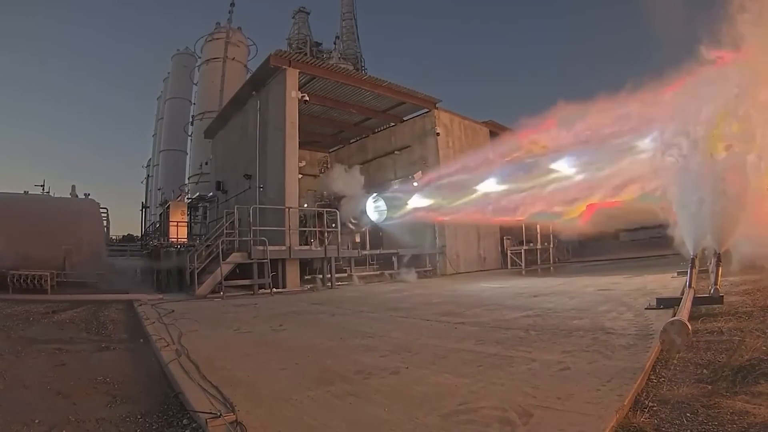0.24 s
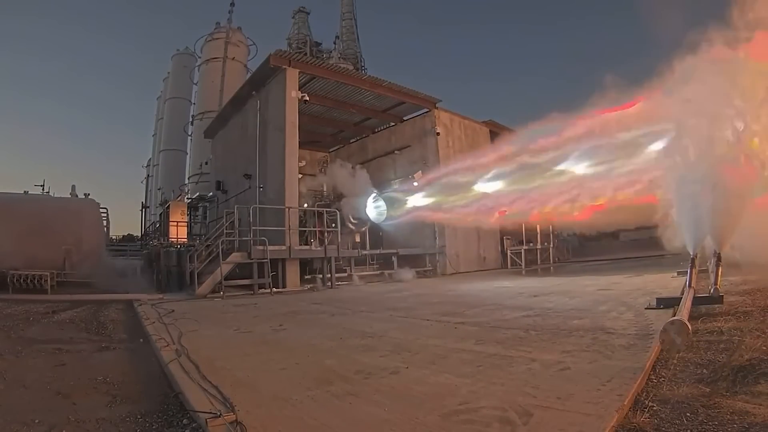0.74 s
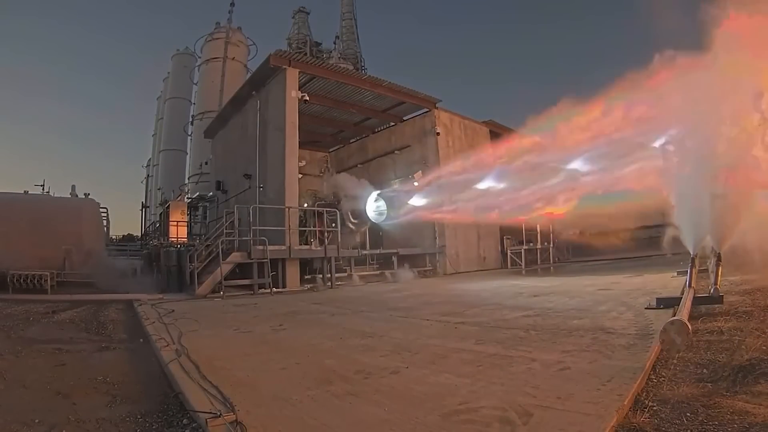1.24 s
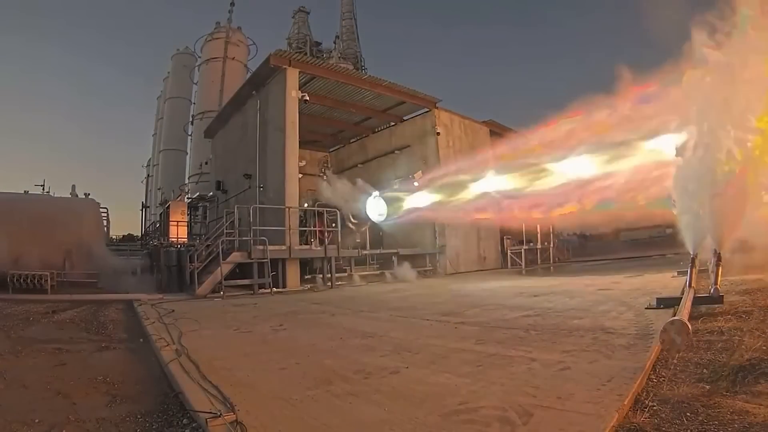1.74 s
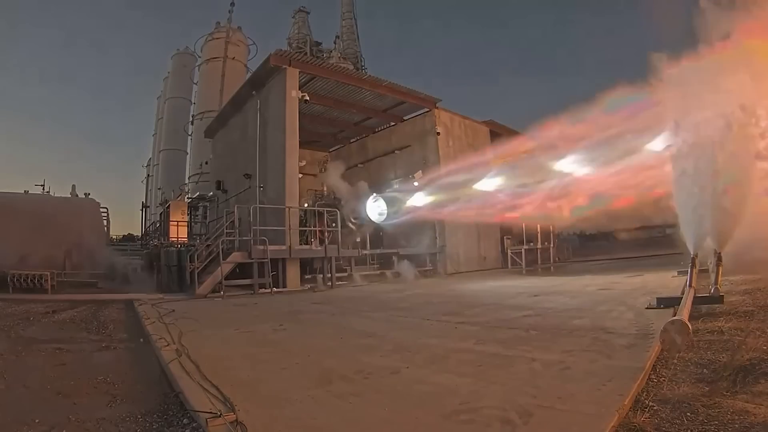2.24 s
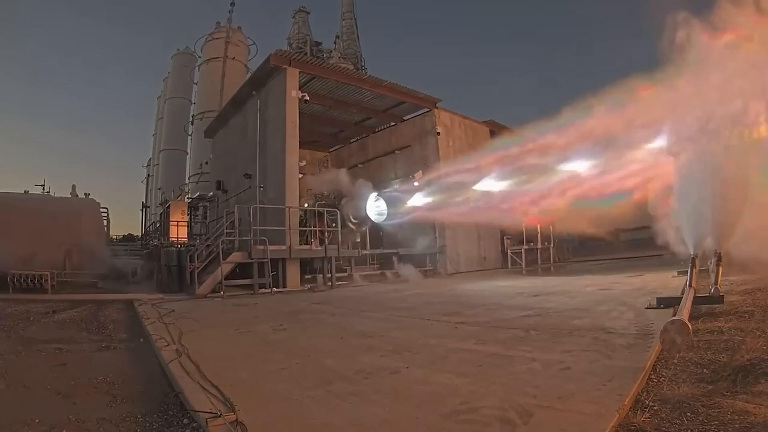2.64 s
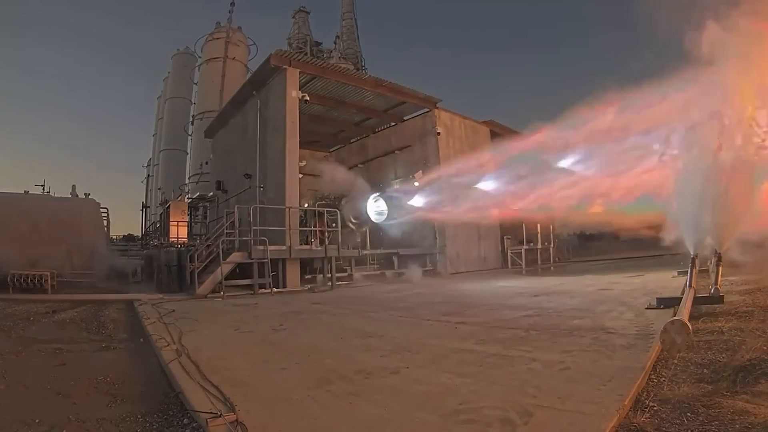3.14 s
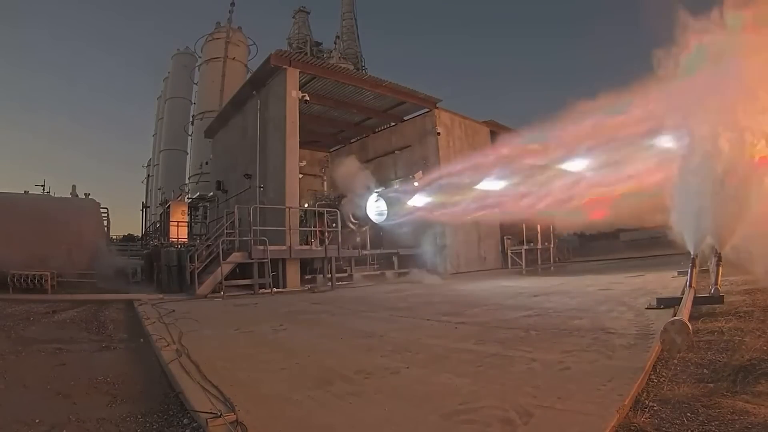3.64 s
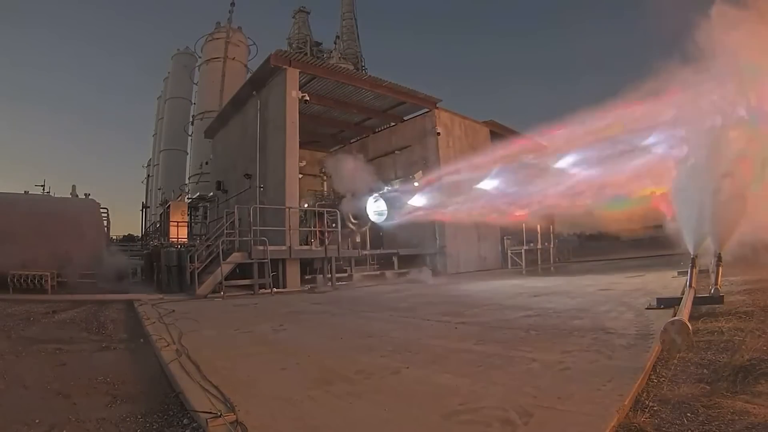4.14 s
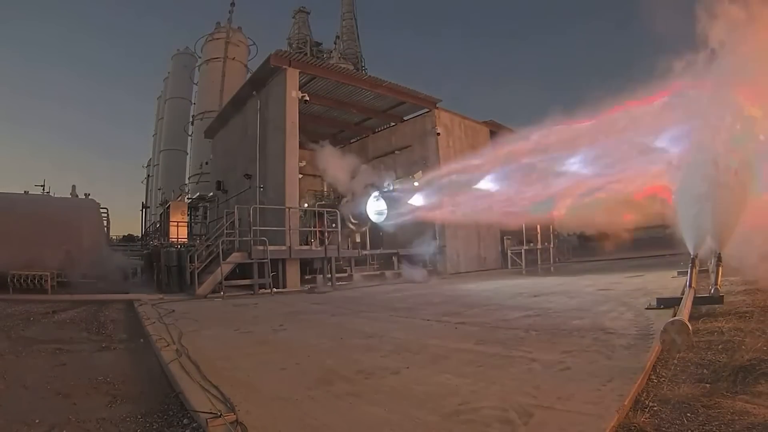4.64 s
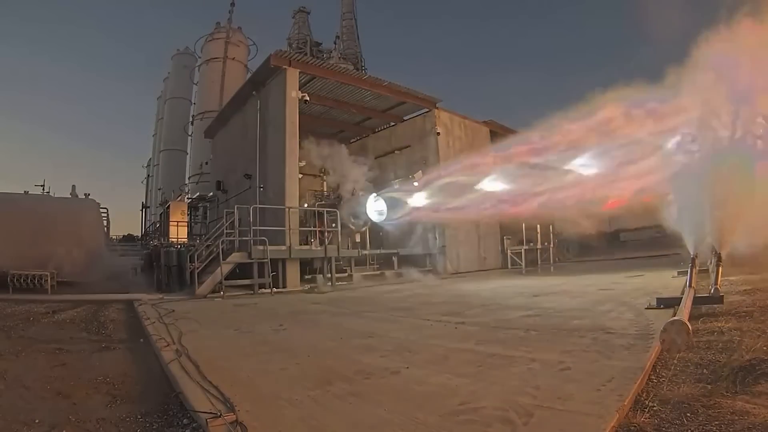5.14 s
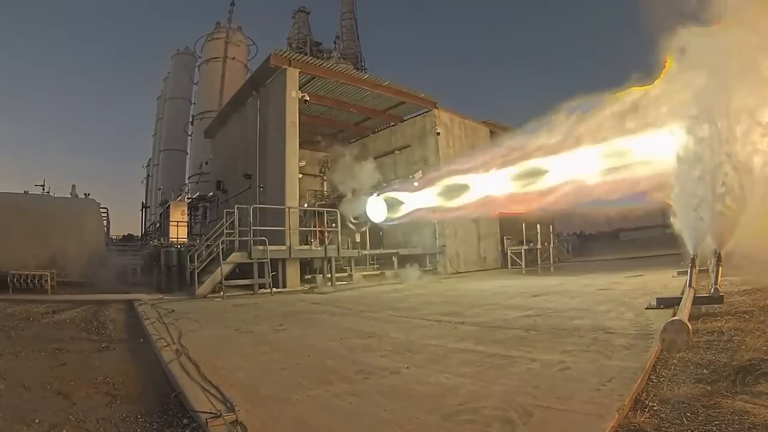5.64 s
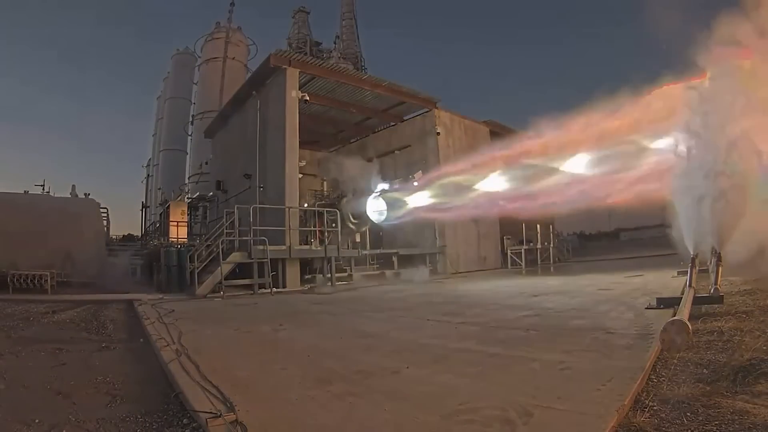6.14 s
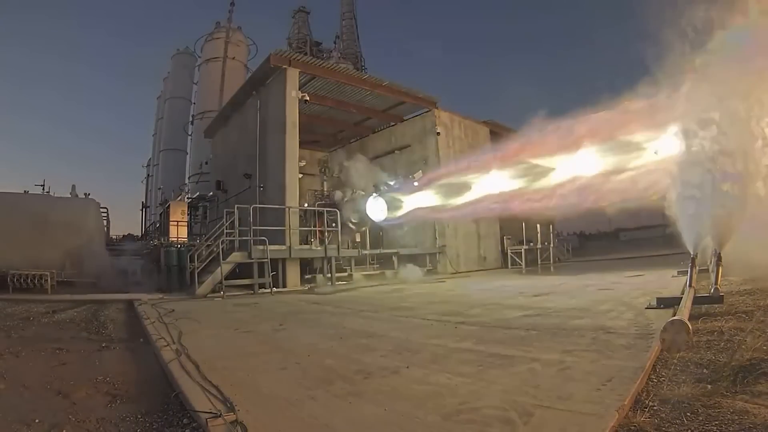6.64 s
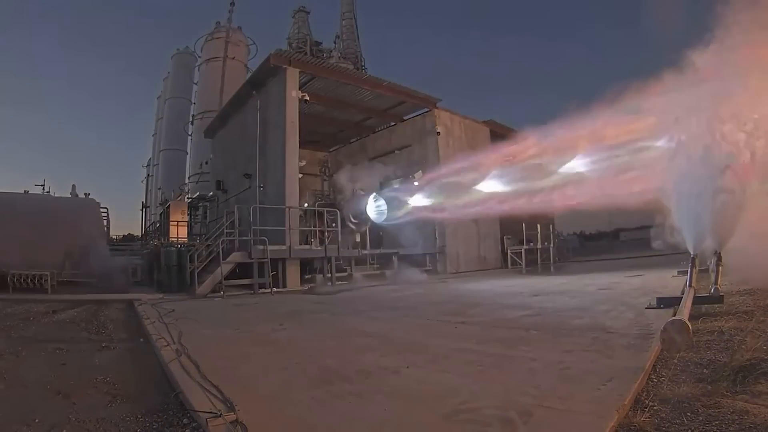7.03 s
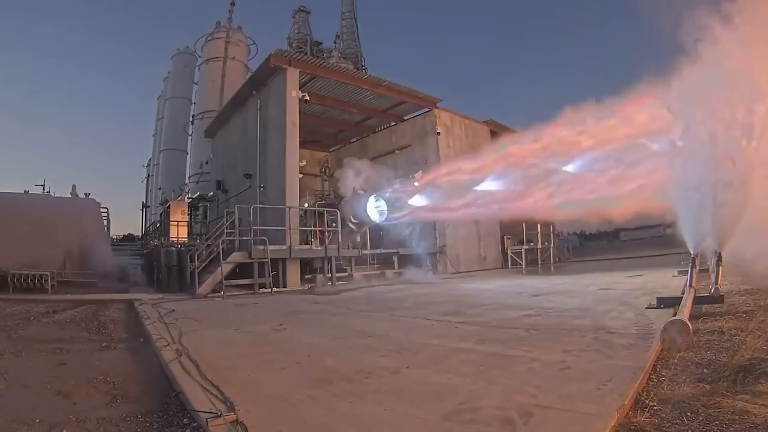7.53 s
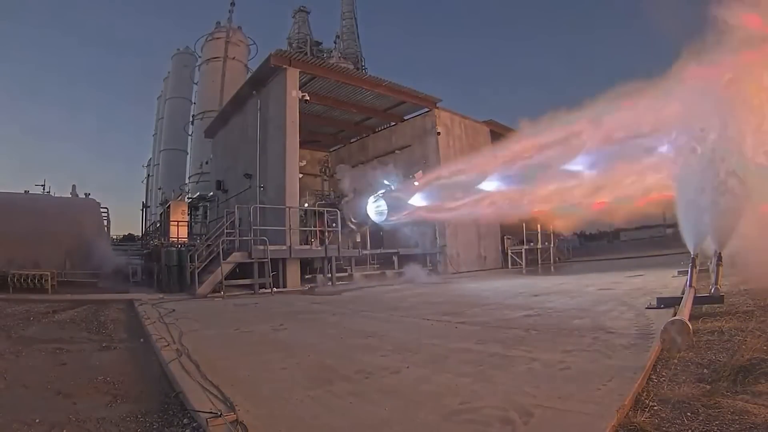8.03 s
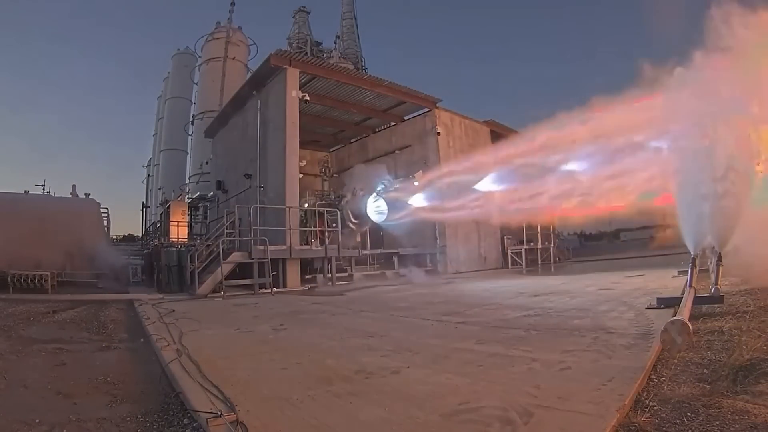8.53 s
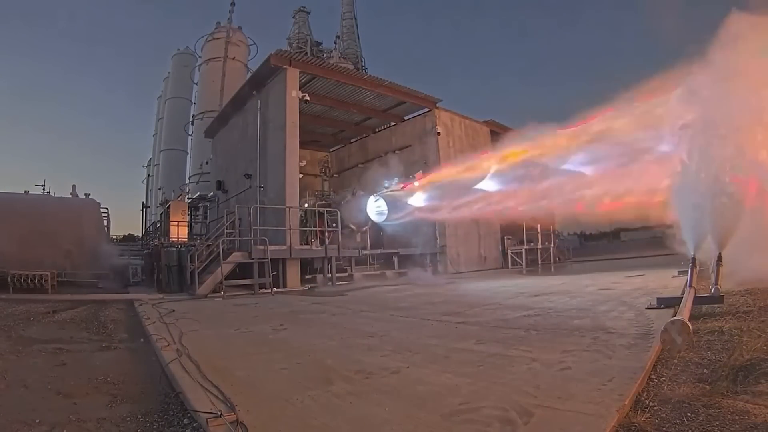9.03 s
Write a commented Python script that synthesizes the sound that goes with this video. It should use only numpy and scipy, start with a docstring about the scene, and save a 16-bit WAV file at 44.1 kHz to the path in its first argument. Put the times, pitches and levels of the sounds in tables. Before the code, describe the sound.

Steady, overwhelming rocket exhaust outdoors, already burning and never stopping. Low bass rumble and a dark, rough roar dominate, with only faint unsteady hiss above. Random pops, cracks and dull knocks tumble over it in clumps, busiest in the first half and sparser later. Short reflections from nearby pipes, walls and an open bay blur each hit. The close stereo microphone sounds boxed in, its level held tightly by limiting.

```python
"""Rocket engine on a test stand

A rocket engine fires steadily outdoors, heard by a small camera in a closed housing.
Layers of shaped noise make the deep, turbulent roar; trains of pulses make the crackle of shock fronts.
Each front arrives dull, then bright off nearby surfaces, and rings the housing with a thud.
The camera's gain control and limiter hold the level."""
import sys
import numpy as np
from scipy import signal
from scipy.fft import rfft, irfft, next_fast_len
from scipy.io import wavfile
from scipy.ndimage import uniform_filter1d, minimum_filter1d

SR = 44100
rng = np.random.default_rng(int(sys.argv[2]) if len(sys.argv) > 2 else 0)


def unload_audio(sound):
    """Save the sound as a 16-bit wav file, at the path given as the first command line argument."""
    columns = np.transpose(np.atleast_2d(sound))
    # keep every value between -1 and 1, then stretch to whole-number steps
    steps = np.round(np.clip(columns, -1, 1) * 32767)
    wavfile.write(sys.argv[1], SR, steps.astype(np.int16))


def boost_factor(decibels):
    """Convert a level in decibels to a linear amplitude factor."""
    exponent = np.asarray(decibels, float) / 20
    return 10 ** exponent


N = 409248


def evened(x):
    """Scales a signal to an rms of 1."""
    return x / np.sqrt(np.mean(x ** 2) + 1e-20)


def read(points, hz):
    """Reads a table between its rows, on a log-frequency axis."""
    f, value = np.transpose(points)
    return np.interp(np.log(hz + 1), np.log(f + 1), value)


def stream(column):
    """One column of the stream of small shock fronts, in dB at every sample."""
    # How strong the stream is over time. Each row: time in seconds, base level of the thuds
    # in the housing in dB, base level shared by the cracks and the hiss in dB.
    stream_levels = [(0, -22.5, -43.5), (1.7, -24, -44.5), (2.35, -22, -42), (3.6, -23.5, -45),
                     (4.06, -21.5, -42.5), (4.6, -24, -44.5), (6.7, -24.5, -43.5), (7.1, -27, -45.5),
                     (9.28, -27.5, -46)]
    return np.interp(np.arange(N) / SR, *np.transpose(stream_levels)[[0, column]])


def plume(column):
    """Level of one layer of the steady burn, drifting evenly, in dB at every sample."""
    # Levels at the start: rumble in dB, roar in dB.
    start_db = (-12.5, -16.5)
    # How fast each level changes: rumble in dB per second, roar in dB per second.
    change_db_per_s = (0.34, 0.04)
    return start_db[column] + change_db_per_s[column] * np.arange(N) / SR


def turbulence(spectrum, size, patchy_db, flicker_db):
    """Stereo noise from random short-time spectra, with drifting patches and a flicker of all pitches."""
    # How alike left and right are. Each row: frequency in Hz, likeness (1 = the same).
    likeness = [(300, 1.0), (450, 0.93), (680, 0.65), (1800, 0.7), (2900, 0.9), (8000, 0.6)]
    frames, hz = 4 * N // size + 5, np.fft.rfftfreq(size, 1 / SR)
    a, b, c, d, patches = rng.standard_normal((frames, len(hz), 5)).T
    patches = uniform_filter1d(patches, size=8, axis=0)  # smooth across frequency
    patches = evened(uniform_filter1d(patches, size=8, axis=1))  # and across time
    flicker = evened(uniform_filter1d(rng.standard_normal(frames), size=3))
    same = read(likeness, hz)[:, None]
    left, other = a + 1j * b, c + 1j * d
    right = same * left + np.sqrt(1 - same ** 2) * other
    level_db = read(spectrum, hz)[:, None] + patchy_db * patches + flicker_db * flicker
    spectra = np.array([left, right]) * boost_factor(level_db)
    return evened(signal.istft(spectra, nperseg=size, noverlap=3 * size // 4)[1][:, :N])


def roar():
    """Large eddies rumble, smaller ones roar and hiss: three layers of shaped noise."""
    # Tone of the rumble. Each row: frequency in Hz, relative level in dB.
    rumble_tone = [(22, -49), (41, 0.5), (65, -1.5), (86, -6.5), (112, -24.5), (150, -48), (250, -120)]
    # Tone of the roar. Each row: frequency in Hz, relative level in dB.
    roar_tone = [(65, -1.5), (110, -2), (201, -4.5), (285, -2.5), (405, -14), (534, -15.5), (628, -9.5),
                 (777, -12), (892, -20), (1150, -20.5), (1550, -25.5), (2200, -29), (2860, -36),
                 (4840, -120)]
    # Tone of the hiss. Each row: frequency in Hz, relative level in dB.
    hiss_tone = [(1500, -29), (2200, 3.5), (3200, 14.5), (4500, 5.5), (6000, -11), (8500, -19.5),
                 (11000, -35), (12500, -20)]
    rumble = boost_factor(plume(column=0)) * turbulence(rumble_tone, size=4096, patchy_db=1.45, flicker_db=1.0)
    body = boost_factor(plume(column=1)) * turbulence(roar_tone, size=2048, patchy_db=0.8, flicker_db=0.92)
    hiss = boost_factor(stream(column=2)) * turbulence(hiss_tone, size=256, patchy_db=1.5, flicker_db=4.0)
    return rumble + body + hiss


def housing_ring(t, pitch):
    """Wall and cavity of the housing act in series: each ring swells, then dies."""
    # Rings of the housing. Each row: frequency in Hz at a pitch of 1, relative level in dB,
    # time to the peak of the ring in milliseconds.
    rings = [(640, -11, 1.4), (865, 0, 1.0), (1250, -15, .6), (1540, -17, 1.4)]
    ring = 0
    for f, db, peak_ms in rings:
        u = 1000 * t / peak_ms
        ring = ring + boost_factor(db) * u * np.exp(1 - u) * np.sin(2 * np.pi * f * pitch * t)
    return ring


def bay_boom(t):
    """The open bay booms: low tones that start softly and die away."""
    # Tones of the open bay. Each row: frequency in Hz, level in dB, time to fall by 60 dB
    # in seconds, start in milliseconds after the bright arrival.
    tones = [(51.5, 1, 0.14, 4), (84.1, -6.5, 0.25, 8.5), (212.3, -3, 0.071, -0.6),
             (269, -5.5, 0.059, -0.19)]
    boom = 0
    for f, db, t60, late_ms in tones:
        since = np.maximum(t - (late_ms + 10) / 1000, 0)
        onset = 1 - np.exp(-since / 0.002)
        boom = boom + boost_factor(db - 60 * since / t60) * onset * np.sin(2 * np.pi * f * since)
    return boom


def fray(t, count):
    """Turbulent air frays each crack into a short burst: spectra of a pulse plus fading noise."""
    smear_ms, smear_db = 0.9, -3  # decay time of the noise, its level against the pulse
    noise = rng.standard_normal((count, len(t))) * np.exp(-1000 * t / smear_ms)
    return 1 + boost_factor(smear_db) * rfft(noise / np.linalg.norm(noise, axis=1, keepdims=True))


def arrivals(pitch, size=16384):
    """Thud, first crack with echoes, and bright crack of a front; the paths shift with its birthplace."""
    # Ways from plume to camera. Each row: delay in milliseconds after the bright arrival at a pitch
    # of 1 and before random shifts, thud in relative dB, crack in relative dB, treble limit in Hz.
    paths = [(-4.5, 0, 4, 7500), (-3.3, -10, -2, 7000), (-.1, -9, 0, 16000), (6.2, -6, -3, 6000),
             (8.2, -13, -5, 6000), (12.5, -15, -8, 7000)]
    # Tone of a crack. Each row: frequency in Hz, relative level in dB.
    crack_tone = [(400, -26), (1200, 13), (2000, 4), (3500, -4), (6000, -13.5), (8800, -12.5), (11000, -12),
                  (12500, -26.5), (13300, -90)]
    glance_hz = 2320  # the bright arrival glances off small surfaces, which return only short waves
    hz, t = np.fft.rfftfreq(size, 1 / SR), np.arange(size) / SR
    ms, thud_db, crack_db, top_hz = np.transpose(paths)[:, :, None]
    shift, lean = rng.standard_normal((2, len(paths), 1))
    late_ms = ms * (1 / pitch + 0.035 * shift) + 10  # starts 10 ms ahead of the bright arrival
    delay = boost_factor(0) * boost_factor(20 * np.log10(boost_factor(1.5 * lean))) * np.exp(-2j * np.pi * hz * late_ms / 1000)

    ring = housing_ring(t, pitch + 0.029 * shift[-1])
    thud = irfft(rfft(ring) * (boost_factor(thud_db) * delay).sum(0))
    thud = thud / abs(thud).max() + bay_boom(t)

    dulled = boost_factor(crack_db) / (1 + 1j * hz / top_hz) ** 2  # paths round an obstacle lose their treble
    crack = boost_factor(read(crack_tone, hz)) * dulled * delay * fray(t, len(paths))
    bright = abs(ms[:, 0]) < 2
    first = crack[~bright].sum(0)
    later = crack[bright].sum(0) * (1j * hz / (1j * hz + glance_hz)) ** 2
    # each crack is scaled by its peak within the band where it stands out
    first_peak = abs(irfft(first * (hz > 2200) * (hz < 6000))).max()
    later_peak = abs(irfft(later * (hz > 5000) * (hz < 9500))).max()
    return thud, irfft(first)[:size // 8] / first_peak, irfft(later)[:size // 8] / later_peak


def scatter(x, wet_db, t60):
    """Sparse taps off pipes and walls, other ones at each port; three sets take turns as the plume shifts."""
    out, turn, length = np.zeros((2, N)), np.arange(N) / SR / 0.037, 2400
    upper = signal.sosfilt(signal.butter(2, 450, "high", fs=SR, output="sos"), x)  # long waves pass the pipes
    for k in range(3):
        taps = rng.choice([-1., 1.], (2, length)) * (rng.random((2, length)) < 0.05)
        taps *= boost_factor(-60 * np.arange(length) / SR / t60)
        taps /= np.linalg.norm(taps[0])
        share = np.sqrt(2 / 3) * np.cos(np.pi * (turn + k / 3))
        out += signal.oaconvolve((upper * share)[None], taps, axes=1)[:, :N]
    return x + boost_factor(wet_db) * out


def small_fronts():
    """A clumped random stream of small fronts: pulse trains for thuds, first cracks and bright cracks."""
    per_s, spread_db = 420, 6  # average rate, spread of the random sizes
    chance, size, clump = rng.random(N), rng.exponential(1, N), rng.standard_normal(N)
    clump = boost_factor(3.5 * evened(uniform_filter1d(clump, size=1800)))
    happens = chance < clump / clump.mean() * per_s / SR
    small = happens * boost_factor(spread_db * np.minimum(size, 2.5))
    cracks = small * boost_factor(stream(column=2) - 3)
    cracks = signal.lfilter(*signal.butter(1, 4240, fs=SR), cracks)  # weak fronts are less steep
    thuds = small ** 0.56 * boost_factor(stream(column=1))  # thuds differ less in level than cracks
    return thuds, cracks * boost_factor(8), cracks


def crackle(count=14):
    """Strong and small fronts from wandering birthplaces, each a thud in the housing and a sharp crack."""
    # The strongest shock fronts. Each row: time of the bright arrival in seconds, thud level in dB,
    # first crack level in dB, bright crack level in dB.
    shocks = [(0.1757, -8, -13, -20), (0.2816, -12, -27, -33), (0.3727, -10, -18, -33),
              (0.4393, -20, -34, -30), (0.4833, -9, -13, -28), (0.6072, -11, -19.5, -32),
              (0.908, -18, -22, -38.0), (0.9835, -5, -16, -20), (0.9987, -6, -17.5, -39.0),
              (1.0909, -2.5, -16, -34.0), (1.4368, -5, -16, -23), (1.7168, -9, -21, -29),
              (2.0568, -10, -18, -26), (2.0709, -10, -30, -27), (2.1641, -3.5, -15, -22),
              (2.2236, -7, -23, -27), (2.2846, -3.5, -19, -21), (2.292, -24, -19, -21.5),
              (2.3545, -5.5, -21, -29), (2.361, -16, -19.5, -24), (2.381, -5.5, -18, -21),
              (2.4543, -6, -20, -27), (2.4844, -8, -31, -25), (2.586, -6.5, -17, -36),
              (2.659, -11, -25, -20), (2.7643, -9, -21, -24), (2.8155, -11, -27, -29),
              (2.8763, -14, -27, -28), (2.902, -5, -20, -23.5), (2.9685, -6, -18.5, -22),
              (3.0263, -4.5, -20, -23), (3.1244, -14, -26, -28), (3.1908, -10, -29, -27.0),
              (3.222, -10.5, -22, -36.0), (3.324, -7, -17, -23), (3.4483, -10, -24, -27),
              (3.7664, -7, -23, -19), (3.7777, -6, -16, -26), (3.8191, -6, -24, -20),
              (3.8765, -6, -18, -20), (3.896, -9, -16.5, -22), (3.9065, -5, -24, -26),
              (3.924, -8, -21, -31), (3.9591, -17, -31, -27), (4.0495, -8, -24, -19),
              (4.0776, -17, -26, -29), (4.1184, -18, -26, -32.0), (4.1801, -5, -27, -20),
              (4.1918, -11, -17, -26), (4.2396, -8, -19, -28), (4.271, -2.5, -16.5, -16.5),
              (4.3877, -9.5, -25, -26), (4.5762, -6.5, -26, -24), (4.6125, -4.5, -17, -32),
              (4.677, -8, -16.5, -33.0), (4.7226, -6, -16, -25), (4.8075, -6, -18, -20),
              (4.8207, -6, -21, -21), (4.6854, -10, -27, -27), (4.9772, -7.5, -31, -25),
              (5.206, -7.5, -26, -23), (5.2163, -11.5, -16.5, -27), (5.2599, -5.5, -15, -21),
              (5.3225, -8.5, -26.0, -22), (5.604, -13, -30, -27), (5.6496, -5.5, -18.5, -25),
              (5.7363, -6.5, -17, -27.0), (5.7961, -10, -18, -31), (5.866, -18, -24, -31),
              (5.893, -8, -20, -37), (5.929, -7, -18, -21), (6.213, -14, -21.5, -40),
              (6.5804, -14, -24, -34), (6.709, -11, -19.5, -32), (6.8223, -9.5, -23, -27),
              (7.0505, -12, -21, -28), (7.1434, -13, -23, -28), (7.167, -11, -20, -25),
              (7.3607, -6, -20.5, -33), (7.5767, -14, -23, -31), (7.804, -9.5, -24.5, -32),
              (7.8853, -27, -27, -47), (7.9443, -18, -26, -30), (8.0922, -18, -21, -21),
              (8.2075, -7.5, -16.5, -23), (8.2575, -21, -22, -31), (8.4, -13, -19.5, -39),
              (8.637, -11, -19, -25), (8.7177, -12, -29, -34), (8.7902, -10, -35, -27)]
    ring_rise = 0.064  # the ring climbs and the paths tighten by this share from start to end
    thuds, firsts, cracks = small_fronts()
    s, thud_db, first_db, crack_db = np.transpose(shocks)
    at = np.round(s * SR).astype(int)
    thuds[at] += boost_factor(thud_db)
    firsts[at] += boost_factor(first_db)
    cracks[at] += boost_factor(crack_db)

    place = count * np.arange(N) / N + 2 * rng.standard_normal(N)  # birthplaces wander
    place = np.clip(place, 0, count - 1).astype(int)
    fronts, early = 0, round(SR / 100)  # the shapes start 10 ms early
    for k in range(count):
        shapes = arrivals(1 + ring_rise * ((k + 0.5) / count - 0.5))
        for train, shape in zip((thuds, firsts, cracks), shapes):
            fronts = fronts + signal.oaconvolve(train * (place == k), shape)[:N + early]
    return scatter(fronts[early:], wet_db=-12.0, t60=0.036)


def scene():
    """Roar and crackle at the two microphone ports."""
    return roar() + crackle()


def microphone_ports(dry):
    """The two ports differ in level and phase, and both lose the lowest bass."""
    # Phase between the ports. Each row: frequency in Hz, lead of the left port in radians.
    left_lead = [(250, 0), (520, -.4), (780, -.15), (1640, -.55), (2150, 0), (3190, .6), (5770, .1),
                 (8800, -.1), (9730, -2.6), (10500, -3.4), (11600, -5.9)]
    # Level between the ports. Each row: frequency in Hz, left minus right in dB.
    left_tilt = [(40, -1.1), (170, -1.92), (510, -1.6), (1480, -0.8), (4330, 0)]
    size = next_fast_len(N)
    hz = np.fft.rfftfreq(size, 1 / SR)
    half = boost_factor(read(left_tilt, hz) / 2) * np.exp(1j * read(left_lead, hz) / 2)
    bass_cut = (1j * hz / (1j * hz + 28)) ** 3
    return irfft(rfft(dry, size) * bass_cut * np.array([half, 1 / half]), size)[:, :N]


def gain_control(ports):
    """Evens out the swells of the rumble: takes back a third of each departure from -13.5 dB."""
    power_db = 10 * np.log10(abs(uniform_filter1d((ports ** 2).mean(0), size=1300)) + 1e-9)
    return ports / boost_factor(0.33 * (power_db + 13.5))


def limiter(ports):
    """Turns both ports down together around each peak, then lets the gain recover."""
    ceiling_db, recovery_db_per_s = -1.1, 110
    room_db = np.minimum(ceiling_db - 20 * np.log10(abs(ports).max(0) + 1e-9), 0)  # headroom lacking
    rise = np.arange(N) * recovery_db_per_s / SR
    held_db = np.minimum.accumulate(minimum_filter1d(room_db, size=65) - rise) + rise
    return ports * boost_factor(uniform_filter1d(np.minimum(held_db, 0), size=65))


def roll_off(x):
    """The treble ends steeply here."""
    return signal.sosfilt(signal.butter(12, 13210, fs=SR, output="sos"), x)


def record(dry):
    """The camera picks up the sound at its ports and holds the level with gain control and limiter."""
    ports = microphone_ports(dry)
    mix = limiter(gain_control(ports))
    return roll_off(mix)


dry = scene()
out = record(dry)
unload_audio(out)
```